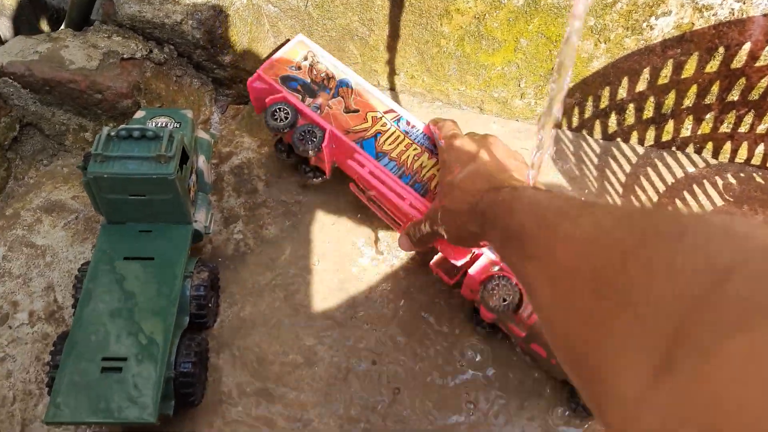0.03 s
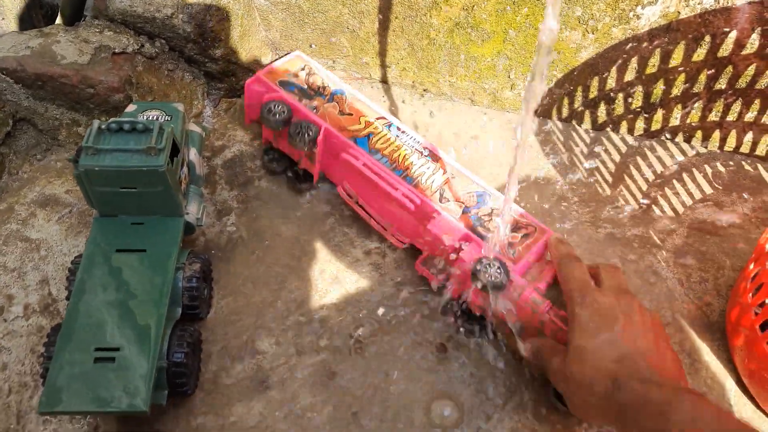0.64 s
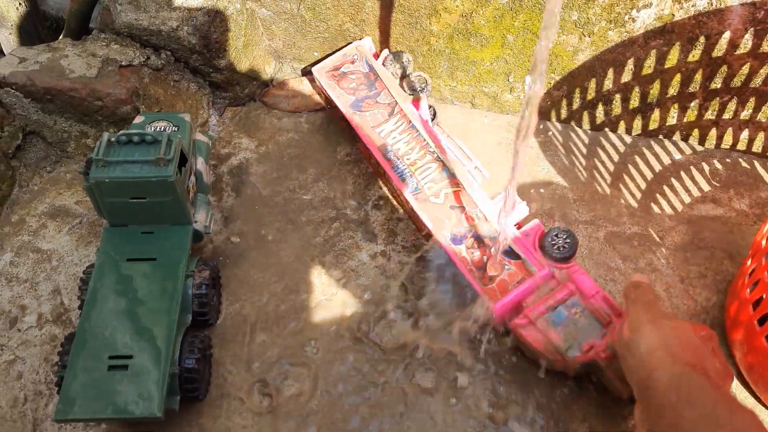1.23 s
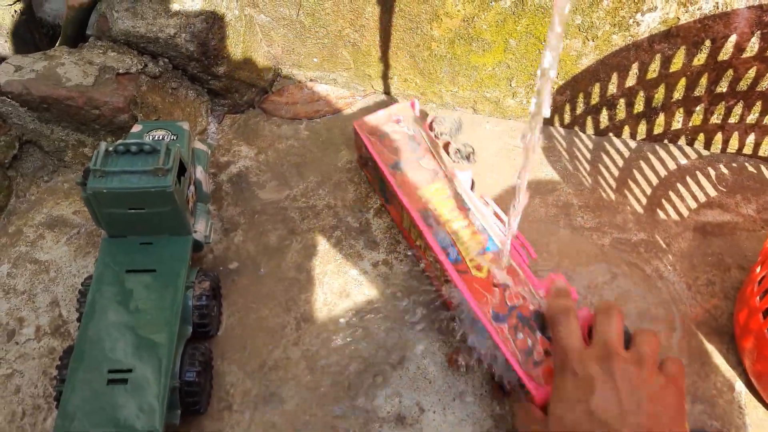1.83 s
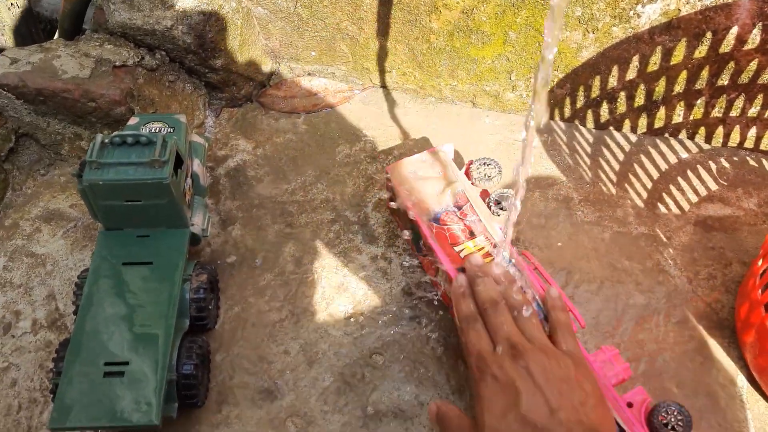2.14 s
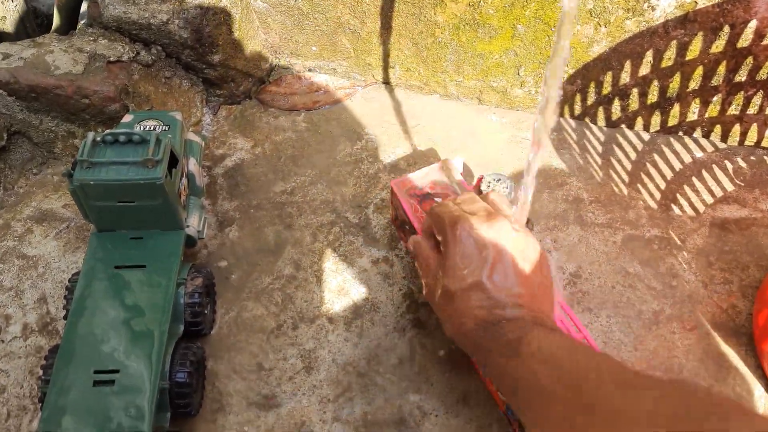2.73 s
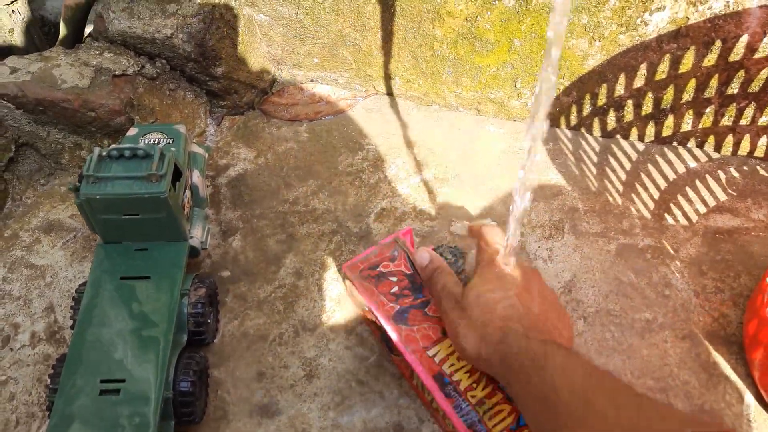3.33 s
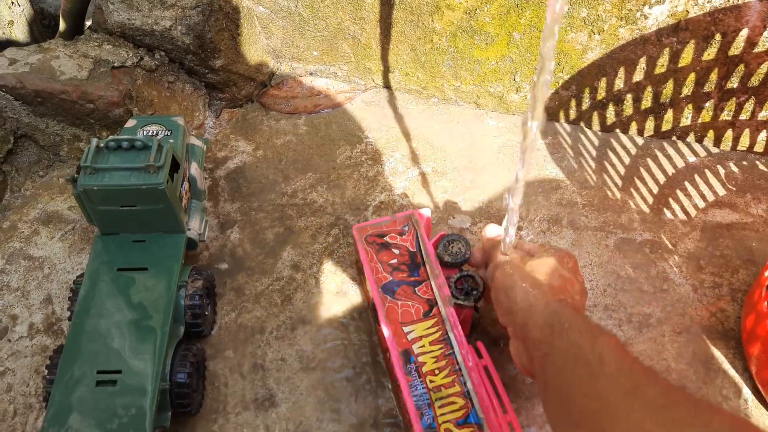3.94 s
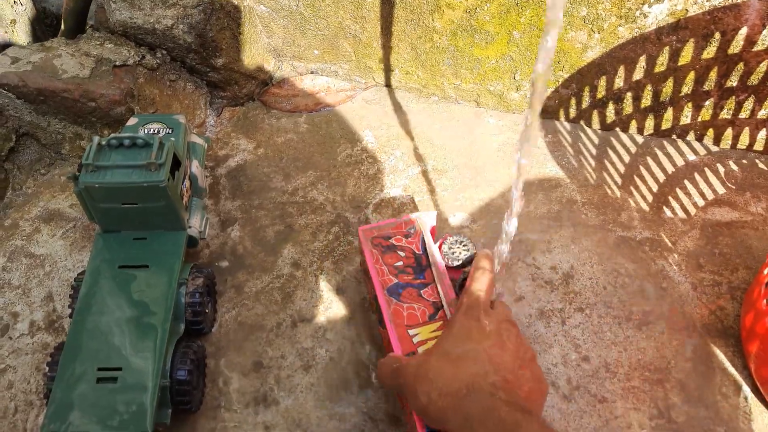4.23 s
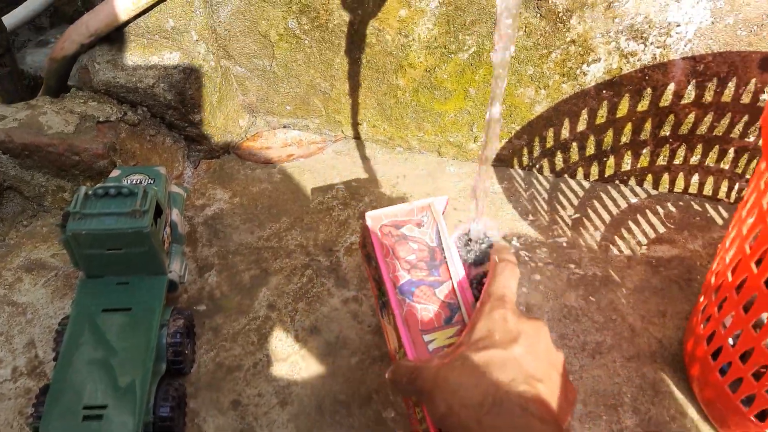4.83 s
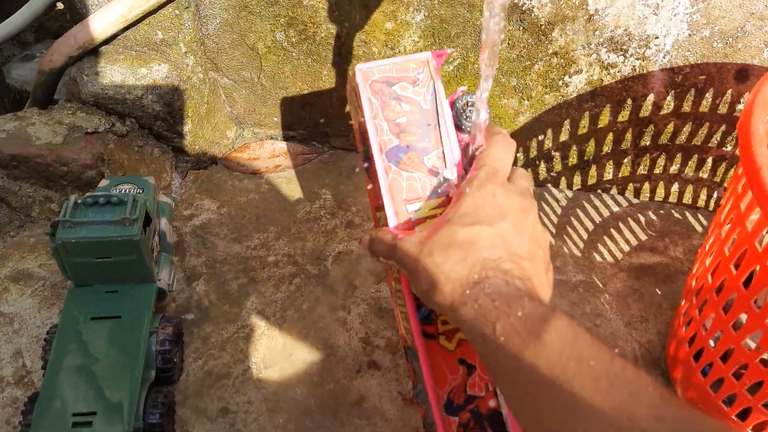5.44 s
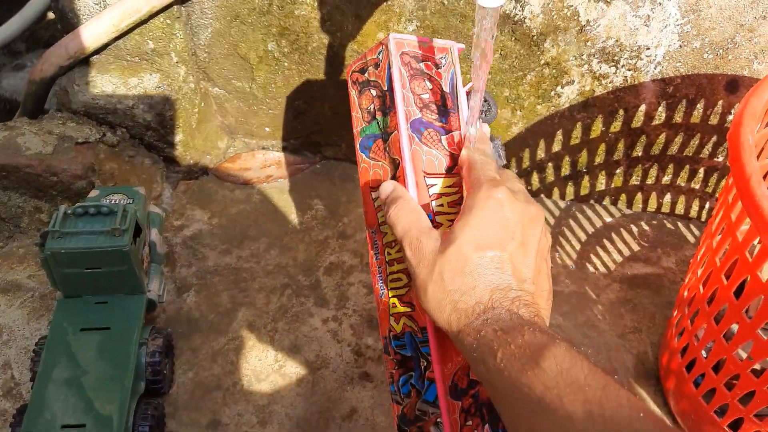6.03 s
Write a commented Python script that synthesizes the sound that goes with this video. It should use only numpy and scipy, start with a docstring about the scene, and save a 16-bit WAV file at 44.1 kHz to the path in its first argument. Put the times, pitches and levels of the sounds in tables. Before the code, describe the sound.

Water splashes over a hollow plastic toy truck as it is rubbed and knocked on concrete, with brief wind on the microphone.

```python
"""A hollow plastic toy truck is rinsed under a water pipe in a concrete yard. From the start the stream
spatters on the toy and the wet ground; a gust touches the microphone. A hand drags, rubs and turns the
truck, which knocks on the concrete, hardest at 0.2, 0.9 and 1.3 s. From 1.5 s water rings in its hollows
now and then. A second strong gust comes at 2.1 s, then the hand briefly catches the stream. After one
more hard knock at 3.9 s the handling dies away, and the water splashes and drips on to 6.2 s."""
import sys
import numpy as np
from scipy import signal
from scipy.fft import rfft, irfft, next_fast_len
from scipy.io import wavfile
from scipy.ndimage import uniform_filter1d

SR = 44100
rng = np.random.default_rng(int(sys.argv[2]) if len(sys.argv) > 2 else 0)


def materialize(psi):
    """Save the field psi as 16-bit PCM at rate SR to the path in sys.argv[1].

    A 1-D psi becomes a single channel; in a 2-D psi each row is a channel.
    """
    bounded = np.clip(np.atleast_2d(psi).T, -1, 1)
    quanta = np.round(bounded * 32767).astype(np.int16)
    wavfile.write(sys.argv[1], SR, quanta)


N = 272979
TIME = np.arange(N) / SR

# Splash and spray spectra. Each row: frequency in Hz, gain in dB.
SPLASH_SPECTRUM = [(150, 4), (350, 6), (800, 0.5), (1300, -3), (2300, 5), (3300, 1.5), (5000, 2.5),
                   (6500, -1), (8200, 1.5), (9400, -33), (16000, -8)]
SPRAY_SPECTRUM = [(2000, -9.5), (5000, 3), (8200, 2.5), (9800, -3.5), (12500, 2.5), (16000, -4.5)]
# The stream, loud on the toy, soft where the hand catches it.
# Each row: time in seconds, splash level in dB, spray level in dB.
STREAM_LEVELS = [(0.0, -52, -61), (0.37, -54.5, -67), (0.4, -48.5, -48), (0.75, -48.5, -43),
                 (1.28, -47, -56), (1.46, -48.5, -42.5), (1.78, -50.5, -49), (2.2, -45.5, -51.5),
                 (2.36, -63, -52.5), (2.6, -62, -60.5), (2.72, -50.5, -55), (3.06, -58, -55.5),
                 (3.3, -45.5, -49.5), (3.57, -55.5, -64), (4.0, -47, -50), (4.35, -46.5, -46.5),
                 (5.65, -48.5, -55), (6.19, -48, -57)]


def splash(splash_db, spray_db):
    """The stream patters, traps small bubbles and throws off a fine spray."""
    droplets = patter()
    mist = bursts(impacts(per_s=650, spread_db=3.5), t60_s=0.069)
    water = droplets + from_db(-1) * bubbles()
    spray = rms_one(colour(np.sqrt(mist) * droplets, SPRAY_SPECTRUM))
    return from_db(splash_db) * rms_one(colour(water, SPLASH_SPECTRUM)) + from_db(spray_db) * spray


def patter(band_share=0.29, bands=8):
    """Droplets burst on wet ground: each noise band blends a common envelope with its own."""
    common = bursts(impacts(per_s=760, spread_db=6.5), t60_s=0.11)
    tops_hz = np.geomspace(900, 16000, bands + 1)[1:]
    noises, out = [stereo_noise(), stereo_noise()], 0
    for k, band_hz in enumerate(zip([120, *tops_hz[:-1]], tops_hz)):
        own = bursts(impacts(per_s=330, spread_db=4.5), t60_s=.014)
        hiss = butterworth(noises[k % 2], band_hz, "band")
        out = out + common ** (1 - band_share) * own ** band_share * hiss
    return rms_one(out)


def bubbles(cycles=30, spread_db=4.0, rise=.06, count=4200, size=600):
    """Small bubbles ring and rise in pitch, each with its own frequency, strength and pan."""
    when, pitch, strength, pan = rng.random((count, 4)).T[:, :, None]
    hz, age_s = 1100 + 7800 * pitch ** 1.3, TIME[:size]
    life = age_s * hz / cycles
    gain = from_db(spread_db * np.minimum(-np.log(1 - strength), 4)) * np.sqrt(hz)
    envelope = gain * np.exp(-np.log(1000) * life)
    phase = 2 * np.pi * hz * age_s * (1 + rise * np.minimum(life, 1))
    samples = ((when * N).astype(int) + np.arange(size)).ravel()
    sides = (envelope * np.sin(phase + sign * np.pi * (pan - .5)) for sign in (1, -1))
    return rms_one(np.array([np.bincount(samples, rings.ravel(), N)[:N] for rings in sides]))


# Gurgles. Each row: centre in seconds, half-length in seconds, resonance in Hz, level in dB.
GURGLES = [(1.566, .14, 2627, -31), (2.35, .16, 2354, -42), (3.014, 0.15, 2600, -36),
           (4.28, 0.19, 2590, -30), (4.623, .2, 2564, -34.5), (5.393, 0.28, 1850, -43.5),
           (6.053, 0.15, 2500, -34)]


def hollows(skirt_hz=170, core_hz=55, core_db=-1, sag_hz_per_s=1700, edge_db=-32):
    """Water gurgles in a hollow: a ringing core in a rough skirt, its pitch falling as the hollow deepens."""
    inflow = bursts(impacts(per_s=900, spread_db=2.5), t60_s=.005)
    drive = inflow * (stereo_noise() + 1j * stereo_noise())
    skirt, core = butterworth(drive, skirt_hz), butterworth(drive, core_hz)
    band = skirt / np.std(skirt) + from_db(core_db) * core[0] / np.std(core)
    out = np.zeros((2, N))
    for centre_s, half_s, hz, db in GURGLES:
        t = np.arange(-half_s, half_s, 1 / SR)
        swell = from_db(edge_db * (t / half_s) ** 2)
        ring = np.exp(2j * np.pi * np.cumsum(hz - sag_hz_per_s * t) / SR)
        add(out, centre_s - half_s, piece(band, centre_s - half_s, swell * ring).real, db)
    return out


# Modes of the plastic body and its thin panels. Each row: frequency in Hz, gain in dB, t60 in seconds.
BODY_MODES = [(240, -10.5, 0.063), (300, 4.5, 0.05), (363.6, 3.5, 0.051), (480, 2, 0.048), (568, 1, 0.1),
              (763, -7, 0.014)]
PANEL_MODES = [(815, 5.5, 0.008), (1245, 4.5, 0.007), (1610, 4.5, 0.018), (1998, 8, 0.019),
               (2594, 4.5, 0.018)]


def body_answer(force, centre_hz, reach_octaves, spill):
    """The place of contact favours body modes near one pitch; the others answer faintly."""
    shares = np.array([from_db(db) * (spill + nearness(hz, centre_hz, reach_octaves))
                       for hz, db, _ in BODY_MODES])
    shares /= np.sqrt(np.sum(shares ** 2, axis=0))
    rings = (rms_one(resonate(force, [mode])) for mode in BODY_MODES)
    return rms_one(sum(share * ring for share, ring in zip(shares, rings)))


def panel_answer(force):
    """The thin panels ring high and short."""
    return rms_one(resonate(force, PANEL_MODES))


# Contact crack spectrum. Each row: frequency in Hz, gain in dB.
CRACK_SPECTRUM = [(1000, -15), (3000, 2.5), (4800, 1), (6300, -5.5), (8300, -3.5), (9400, -20.5),
                  (12500, -14.5), (16000, -35)]
# Knocks on concrete. Each row: start in seconds, thump, clack and crack levels in dB,
# body centre in Hz, struck panel pitch in Hz.
TOY_KNOCKS = [(0.157, -40.5, -39, -48, 356, 1290), (0.184, -27.5, -30.5, -43, 400, 900),
              (0.207, -26.5, -20, -31.5, 373, 2900), (0.212, -15.5, -22.5, -27.5, 413, 790),
              (0.227, -32, -28, -47, 400, 2670), (0.2471, -33, -33, -64, 470, 810),
              (0.26, -31, -35, -55, 442, 800), (0.695, -36, -48, -41.5, 424, 2660),
              (0.719, -34, -34, -39.5, 446, 1400), (0.859, -18.5, -25, -25.5, 370, 2710),
              (0.9042, -23.5, -29, -36, 362, 810), (0.911, -25, -31, -37, 370, 2580),
              (0.935, -25, -45, -50, 372, 800), (1.147, -49.5, -43.5, -59, 470, 720),
              (1.2438, -41, -41, -70, 407, 1650), (1.275, -19, -17.5, -34.5, 327, 2520),
              (1.361, -36, -31, -40.5, 485, 1060), (1.375, -36, -32.5, -60, 510, 1390),
              (1.4, -35, -29.5, -62, 343, 2080), (1.833, -28, -45, -77, 400, 1100),
              (1.92, -25, -46, -58, 380, 910), (1.984, -23.5, -30, -60, 586, 840),
              (2.178, -41, -46, -64, 540, 820), (2.513, -28.5, -36, -42.5, 328, 780),
              (2.956, -41, -38.5, -42, 506, 2420), (3.385, -44.5, -40, -56, 455, 1030),
              (3.767, -28, -40, -49, 510, 790), (3.9132, -19.5, -21, -25.5, 259, 1760),
              (3.923, -22.5, -38, -40, 508, 796), (4.551, -36.5, -28, -39.5, 507, 1330),
              (4.765, -51, -44, -58, 550, 3350)]


def knocks():
    """A blow thumps the hollow body, clacks the loose panels and cracks at the point of contact."""
    out, noise = np.zeros((2, N)), stereo_noise()
    bright = colour(noise, CRACK_SPECTRUM)
    push = blow(t60_s=0.00074, rise_s=0.00013)
    rocking = rms_one(resonate(push, [(157, 0, 0.043)]))   # the toy rocks on its wheels
    snap = blow(t60_s=.02, rise_s=.0004)
    contact = snap + from_db(-11) * blow(t60_s=.035, rise_s=.002)   # loose parts buzz on
    for s, thump_db, clack_db, crack_db, centre_hz, panel_hz in TOY_KNOCKS:
        body = body_answer(push, centre_hz, reach_octaves=0.11, spill=0.12)
        thump = rms_one(body * blow(t60_s=1.0, rise_s=0.00013))
        chatter = panel_answer(piece(noise, s, contact))
        tone = np.sin(2 * np.pi * panel_hz * TIME[:len(push)])
        struck_panel = rms_one(tone * blow(t60_s=0.018, rise_s=0.00014))
        add(out, s, thump + from_db(-21) * rocking, thump_db)
        add(out, s, chatter + from_db(-1.5) * struck_panel, clack_db)
        add(out, s + .0005, piece(bright, s, contact), crack_db)
    return out


# Scrape spectrum. Each row: frequency in Hz, gain in dB.
GRIT_SPECTRUM = [(300, 0.5), (700, 6), (1900, -1.5), (2700, -1), (3400, -14), (5000, -11), (8200, -38),
                 (9500, -70), (16000, -25)]
# Drags and rubs. Each row: time of full pressure, attack, hold and release in seconds,
# body and grit levels in dB, body centre in Hz.
HAND_STROKES = [(-0.002, 0.055, 0.036, 0.19, -63, -45, 330), (0.254, 0.048, 0.021, .03, -33, -47, 400),
                (0.497, 0.13, 0.036, 0.086, -41.5, -48, 433), (0.662, 0.012, 0.1, .05, -41.5, -42, 435),
                (0.734, 0.078, 0.097, 0.019, -35, -41, 316), (0.933, 0.044, 0.032, .05, -34, -44, 358),
                (1.288, 0.017, .11, 0.062, -39, -37.5, 373), (1.55, 0.087, 0.091, 0.04, -45.5, -66, 380),
                (1.859, 0.14, 0.14, 0.22, -30.5, -29, 406), (2.083, 0.062, 0.034, 0.71, -53, -61, 380),
                (2.479, 0.073, 0.048, 0.068, -39.5, -39.5, 328), (2.666, 0.11, .17, 0.12, -44, -41, 378),
                (2.942, 0.11, 0.11, 0.11, -50, -53.5, 355), (3.176, 0.092, 0.083, 0.15, -35, -41.5, 404),
                (3.324, 0.056, 0.035, 0.21, -38.5, -40, 406), (3.71, 0.17, 0.027, 0.092, -35.5, -40, 473),
                (3.772, 0.066, 0.096, 0.035, -32.5, -40, 540), (3.9, 0.067, 0.015, 0.52, -43, -55, 375),
                (4.314, 0.18, 0.025, 0.11, -38.5, -41.5, 330)]


def rubbing(groan_db=-1):
    """Plastic catches and slips on wet concrete; each slip shakes body and panels."""
    effort = np.array([pressure(*row[:4]) for row in HAND_STROKES]) ** 2
    body_db, grit_db, stroke_hz = np.transpose(HAND_STROKES)[4:]
    centre_hz = stroke_hz @ effort / effort.sum(axis=0)
    body_gain, grit_gain = np.sqrt(from_db([body_db, grit_db]) ** 2 @ effort)
    slips = bursts(impacts(per_s=800, spread_db=2.6), t60_s=.008) * stereo_noise()
    body = body_answer(slips, centre_hz, reach_octaves=0.22, spill=0.031)
    grit = rms_one(panel_answer(slips) + from_db(15) * rms_one(colour(slips, GRIT_SPECTRUM)))
    return body_gain * body + grit_gain * grit + from_db(groan_db) * groan(slips, body_gain, centre_hz)


def pressure(full_s, attack_s, hold_s, release_s, ramp_db=24.5):
    """The hand bears down, holds and lets go, by ramp_db per attack or release time."""
    slack = np.maximum((full_s - TIME) / attack_s, (TIME - full_s - hold_s) / release_s)
    return from_db(-ramp_db * np.clip(slack, 0, 10))


def groan(slips, gain, centre_hz, lock_db=-28):
    """Under firm pressure the slips lock to one body mode, which rings evenly."""
    mode = BODY_MODES[2]
    ring = resonate(slips[0], [mode])
    even_ring = ring / np.sqrt(uniform_filter1d(ring ** 2, size=500) + 1e-12)
    firmness = np.tanh(gain / from_db(lock_db))
    return gain * firmness * nearness(mode[0], centre_hz, reach_octaves=0.25) * even_ring


# Single drops. Each row: start in seconds, level in dB, pitch in Hz.
FAT_DROPS = [(0.5724, -44, 7450), (0.614, -41.5, 5160), (0.6838, -40.5, 6700), (1.1958, -41.5, 2580),
             (1.4419, -35, 3560), (2.2353, -41, 5640), (2.3316, -43.5, 2360), (3.477, -46, 8400),
             (3.679, -39, 6950), (4.1419, -40, 2620), (4.2734, -37.5, 2600), (4.289, -36.5, 2650),
             (4.952, -39.5, 5650), (5.008, -47, 6400), (5.136, -43, 4770), (5.218, -41, 5950),
             (5.3117, -43.5, 7950), (5.4072, -44, 5370), (5.6222, -43.5, 5350), (5.7813, -42, 5900),
             (5.8046, -39.5, 3380)]


def drops(cycles=22):
    """A fat drop lands with a bright slap and a brief ring."""
    out = np.zeros((2, N))
    noise = colour(stereo_noise(), [(1000, -13), (5000, 1.5), (8200, -0.5), (9500, -13), (13000, -12)])
    spreading = blow(t60_s=.028, rise_s=.0006)
    for s, db, hz in FAT_DROPS:
        slap = piece(noise, s, spreading)
        add(out, s, slap + resonate(slap, [(hz, 8, cycles / hz)]), db)
    return out


# Larger bubbles. Each row: start in seconds, level in dB, starting pitch in Hz.
BUBBLE_PLINKS = [(1.062, -39, 3680), (3.235, -47, 5920), (3.289, -38, 3850), (3.391, -41, 6800),
                 (3.963, -35, 2780), (4.021, -44, 2220), (5.206, -51, 3060), (5.241, -50, 2500),
                 (5.447, -49, 1440)]


def plinks(cycles=42, rise=0.13, size=2000):
    """A trapped bubble rings briefly, rising in pitch as it nears the surface."""
    out, age_s = np.zeros((2, N)), TIME[:size]
    for s, db, hz in BUBBLE_PLINKS:
        life = age_s * hz / cycles
        tone = np.sin(2 * np.pi * hz * age_s * (1 + rise * np.minimum(life, 1) / 2))
        add(out, s, tone * blow(t60_s=2 * cycles / hz, rise_s=0.0012, size=size), db)
    return out


# Tick spectrum. Each row: frequency in Hz, gain in dB.
FLICK_SPECTRUM = [(3000, -39), (7000, 7), (9500, -3), (13000, 7), (16000, 1.5)]
# Flicked droplets. Each row: start in seconds, level in dB.
HAND_FLICKS = [(0.276, -50), (0.41, -46), (0.656, -53), (0.845, -49), (1.644, -35.5), (1.9395, -42),
               (2.236, -40.5), (2.397, -55), (2.664, -51), (3.388, -42), (3.471, -43.5), (4.1425, -52),
               (4.337, -40), (4.704, -47), (5.009, -43.5)]


def flicks(left_db=-2):
    """Tiny fast droplets fly off the hand and tick brightly near the right microphone."""
    out = np.zeros((2, N))
    noise = colour(rng.standard_normal((2, SR)), FLICK_SPECTRUM) * from_db([[left_db], [0]])
    tick = blow(t60_s=0.03, rise_s=0.00062)
    for s, db in HAND_FLICKS:
        add(out, s, piece(noise, s, tick), db)
    return out


def drumming(splash_db, relative_db=-9):
    """The stream drums softly on the plastic body."""
    beats = bursts(impacts(per_s=130, spread_db=3.5), t60_s=0.004) * stereo_noise()
    return from_db(splash_db + relative_db) * rms_one(resonate(beats, BODY_MODES))


# Gust and outdoor rumble spectra. Each row: frequency in Hz, gain in dB.
GUST_SPECTRUM = [(20, -23), (38, -3), (58, -1.5), (130, 4.5), (220, -9.5), (500, -14.5), (2000, -67)]
RUMBLE_SPECTRUM = [(20, -24), (38, -21), (56, 7), (110, -1.5), (250, -19), (1000, -16), (4000, -65)]
# Gusts. Each row: peak time in seconds, peak level on the right in dB.
WIND_GUSTS = [(0.0, -32.5), (0.22, -56), (0.87, -48), (2.11, -30.5), (3.25, -54)]


def wind(rise_db_per_s=104, fall_db_per_s=53, breeze_db=-62.5, left_db=-12, rumble_db=-61):
    """Gusts rise fast and die slowly, buffeting mostly the right microphone over a faint rumble."""
    strength = from_db(breeze_db)
    for s, db in WIND_GUSTS:
        below_peak_db = np.maximum(rise_db_per_s * (s - TIME), fall_db_per_s * (TIME - s))
        strength = strength + from_db(db - below_peak_db)
    gusts = strength * rms_one(colour(stereo_noise(), GUST_SPECTRUM)) * from_db([[left_db], [0]])
    return gusts + from_db(rumble_db) * rms_one(colour(stereo_noise(), RUMBLE_SPECTRUM))


def yard(x, t60_s=0.22, wet_db=-17, size=12000):
    """Wall and ground add a short, faint scatter."""
    echo = blow(t60_s, rise_s=.005, size=size) * rng.standard_normal((2, size))
    echo /= np.sqrt(np.sum(echo ** 2, axis=1, keepdims=True))
    return x + from_db(wet_db) * signal.fftconvolve(x, echo, axes=1)[:, :N]


# Left-right likeness. Each row: frequency in Hz, correlation (clipped to 0-1 in use).
MIC_CORRELATION = [(60, 1), (250, 0.5), (450, 1.5), (700, 0.88), (2500, -0.58), (6000, -0.3), (14000, 0.7)]


def stereo_noise():
    """White noise, alike on both sides in the bass, less so in the treble."""
    size = next_fast_len(N)
    alike = np.clip(at_bins(MIC_CORRELATION, size), 0, 1)
    mid, side = rfft(rng.standard_normal((2, size)))
    return irfft(np.sqrt(1 + alike) * mid + np.sqrt(1 - alike) * side * [[1], [-1]], size)[:, :N]


def from_db(db):
    """Decibels to gain."""
    return 10 ** (np.asarray(db) / 20)


def rms_one(x):
    """Scale to rms 1."""
    return x / np.sqrt(np.mean(x ** 2) + 1e-20)


def in_time(rows):
    """Each column of a time curve at every sample."""
    s, *columns = np.transpose(rows)
    return [np.interp(TIME, s, column) for column in columns]


def at_bins(points, size):
    """A curve over log frequency, read at the Fourier bins."""
    hz, value = np.transpose(points)
    return np.interp(np.log(np.fft.rfftfreq(size, 1 / SR) + 1), np.log(hz), value)


def colour(x, spectrum):
    """Filter by a curve of (Hz, dB) points."""
    size = next_fast_len(x.shape[-1])
    return irfft(rfft(x, size) * from_db(at_bins(spectrum, size)), size)[..., :x.shape[-1]]


def butterworth(x, hz, kind="low", order=2):
    """Filter with a flat passband."""
    return signal.sosfilt(signal.butter(order, hz, kind, fs=SR, output="sos"), x)


def nearness(hz, centre_hz, reach_octaves):
    """Bell curve over pitch, 1 at the centre."""
    return np.exp(-.5 * (np.log2(hz / centre_hz) / reach_octaves) ** 2)


def resonate(x, modes):
    """Parallel resonances (Hz, dB, t60 s) of alternating sign."""
    out = 0
    for k, (hz, db, t60_s) in enumerate(modes):
        radius = from_db(-60 / (t60_s * SR))
        zeros = np.array([1, 0, -1]) * (1 - radius ** 2) / 2
        poles = [1, -2 * radius * np.cos(2 * np.pi * hz / SR), radius ** 2]
        out = out + (-1) ** k * from_db(db) * signal.lfilter(zeros, poles, x + 1e-18)
    return out


def impacts(per_s, spread_db):
    """Impulses at random times: many small, a few large."""
    sizes = from_db(spread_db * np.minimum(rng.exponential(1, N), 4))
    return sizes * (rng.random(N) < per_s / SR)


def bursts(hits, t60_s):
    """Envelope of one decay per impulse, summed in power; rms 1."""
    power_decay = from_db(-120 / (t60_s * SR))
    return rms_one(np.sqrt(signal.lfilter([1], [1, -power_decay], hits ** 2 + 1e-18)))


def blow(t60_s, rise_s, size=6000):
    """Envelope of one contact: quick rise, then decay."""
    age_s = TIME[:size]
    return (1 - np.exp(-age_s / rise_s)) * np.exp(-np.log(1000) * age_s / t60_s)


def piece(noise, start_s, envelope):
    """A stretch of noise under an envelope."""
    return np.take(noise, round(start_s * SR) + np.arange(len(envelope)), axis=1, mode="wrap") * envelope


def add(out, start_s, sound, db):
    """Mix in a short sound with the energy of 20 ms at the given level."""
    at = round(start_s * SR)
    sound = sound / np.sqrt(np.mean(np.sum(sound ** 2, axis=-1)) / (.02 * SR))
    out[:, at:at + sound.shape[-1]] += from_db(db) * sound[..., :N - at]


def lag_left(x, delays):
    """A source on the right reaches the left microphone later."""
    size = next_fast_len(N + 100)
    phase_shift = np.exp(-2j * np.pi * np.fft.rfftfreq(size, 1 / SR) * at_bins(delays, size))
    return np.array([irfft(rfft(x[0], size) * phase_shift, size)[:N], x[1]])


# Lag of water and toy at the left microphone. Each row: frequency in Hz, delay in seconds.
WATER_DELAYS = [(300, 0.0003), (2000, 0.00015)]
TOY_DELAYS = [(380, 0.000014), (560, 0.0002), (1200, 0.00042), (2000, 0.000442)]


def scene():
    """Water and toy in the yard, wind on top."""
    splash_db, spray_db = in_time(STREAM_LEVELS)
    water = splash(splash_db, spray_db) + drops() + flicks() + plinks() + hollows()
    toy = knocks() + rubbing() + drumming(splash_db)
    return yard(lag_left(water, WATER_DELAYS) + lag_left(toy, TOY_DELAYS)) + wind()


# Microphone balance. Each row: frequency in Hz, left minus right in dB.
MIC_BALANCE = [(250, -1.5), (500, 2.5), (900, -4), (1500, -3.5), (2600, 2), (5000, 0.5), (7000, 2),
               (9000, -6), (14000, -7.5)]


def record(dry, ceiling=0.91, low_cut_hz=47, high_cut_hz=15900):
    """Each microphone has its own colour; peaks are rounded, deep bass and top are cut."""
    left = colour(dry[0], [(hz, db / 2) for hz, db in MIC_BALANCE])
    right = colour(dry[1], [(hz, -db / 2) for hz, db in MIC_BALANCE])
    rounded = ceiling * np.tanh(np.array([left, right]) / ceiling)
    bass_cut = butterworth(rounded, low_cut_hz, "high", order=4)
    return signal.sosfilt(signal.ellip(10, .2, 80, high_cut_hz, fs=SR, output="sos"), bass_cut)


dry = scene()
out = record(dry)
materialize(out)
```